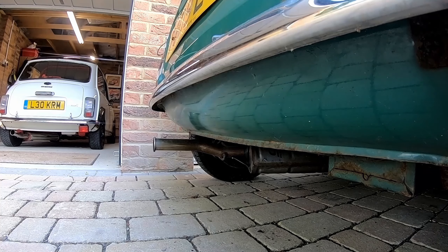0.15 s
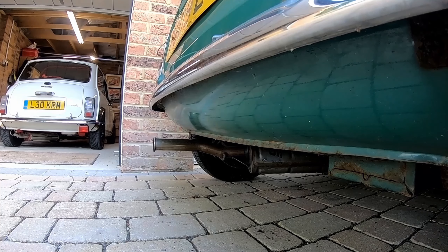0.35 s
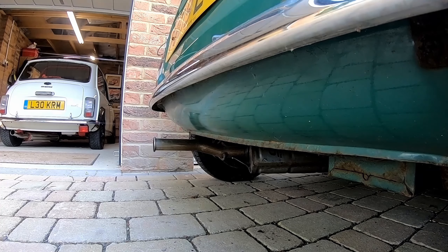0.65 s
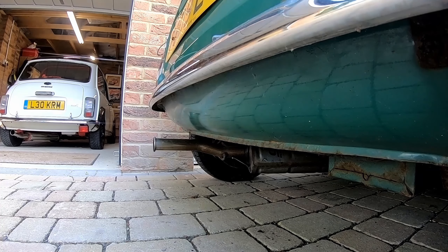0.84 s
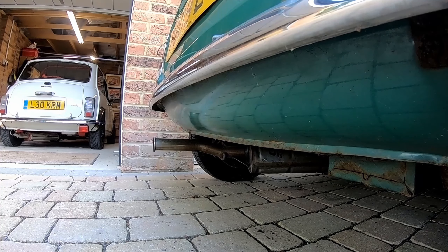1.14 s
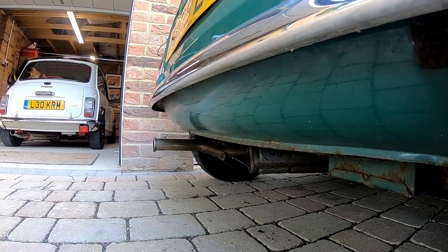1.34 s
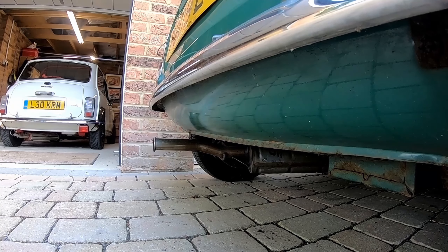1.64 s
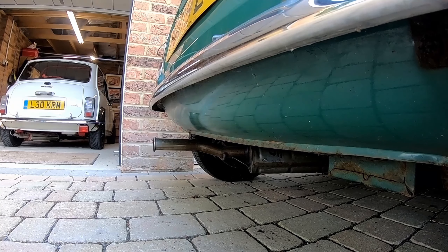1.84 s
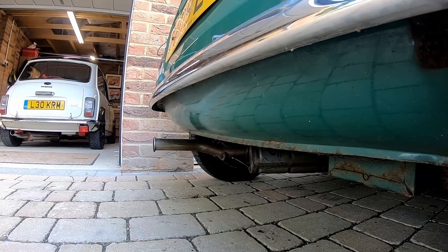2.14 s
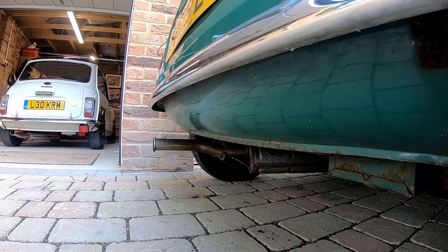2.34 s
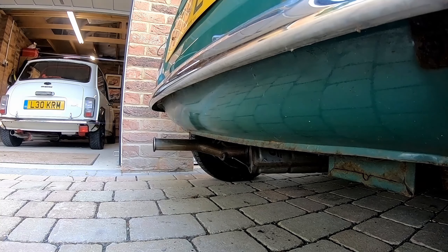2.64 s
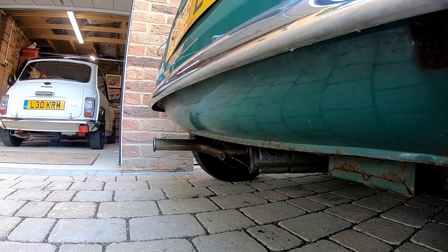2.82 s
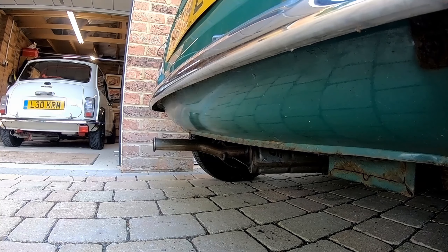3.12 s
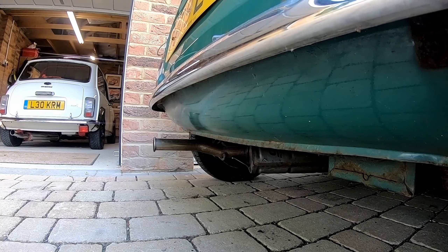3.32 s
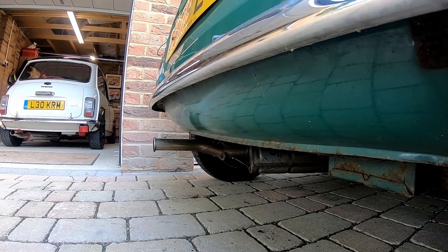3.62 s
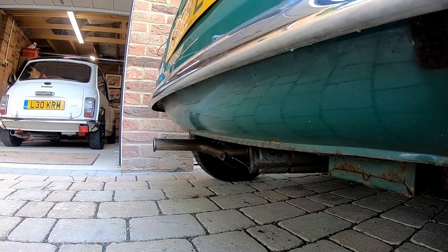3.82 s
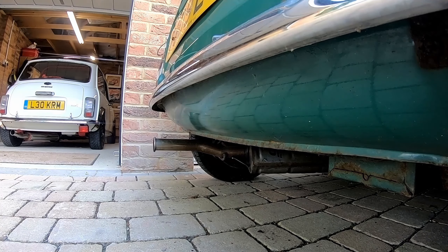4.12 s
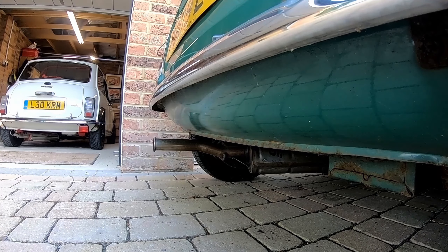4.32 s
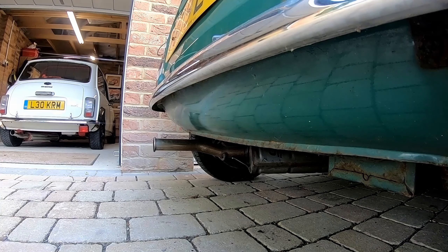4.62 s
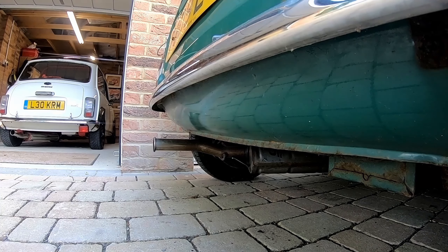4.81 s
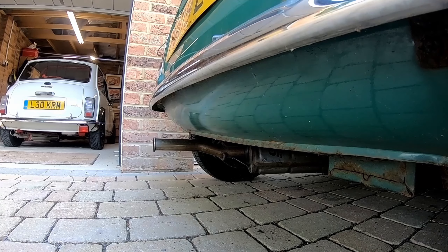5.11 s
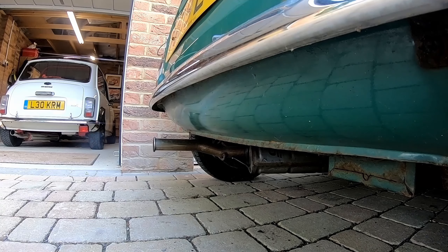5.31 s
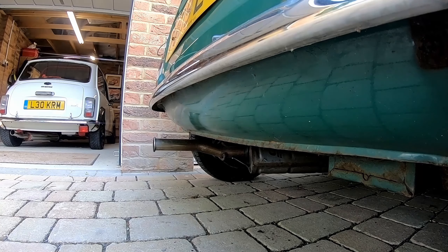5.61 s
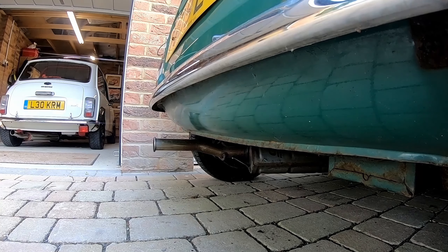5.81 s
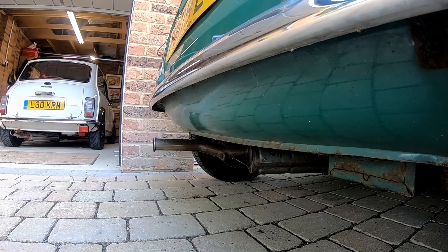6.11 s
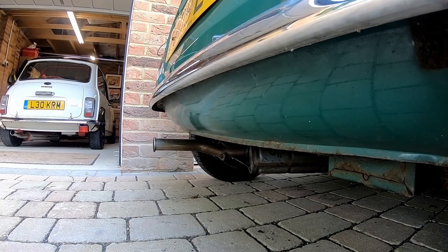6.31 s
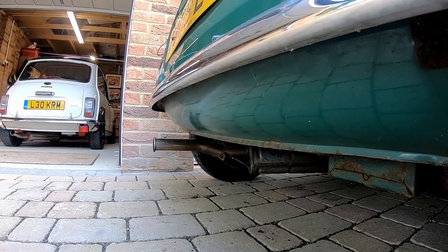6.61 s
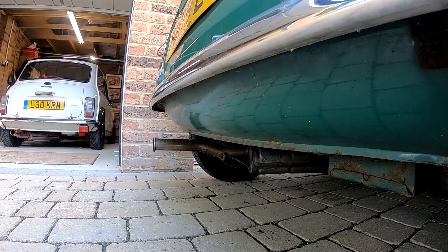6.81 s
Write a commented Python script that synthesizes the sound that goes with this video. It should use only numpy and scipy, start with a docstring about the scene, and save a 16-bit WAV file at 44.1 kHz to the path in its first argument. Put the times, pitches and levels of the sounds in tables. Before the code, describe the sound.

Close stereo pickup by a tailpipe outside a garage. A small four-cylinder engine idles for the first second as a deep, fairly even putter of about forty soft puffs a second, with faint hiss and valve clatter and a tiny dry tick near 0.2. At 1.07 the throttle snaps open with a short intake gasp; revs double by 1.3, then sag to a hollow drone until 2.2. A second, harder blip climbs to a growling, raspy peak at 2.55, about three times idle speed. The throttle shuts and the revs slide down, burbling, ringing and missing beats over low rumble, with a light pop near 3.5, reaching idle by 4.9. At 5.1 a third blip roars up, peaking at 5.5. Its descent is rough and stuttering, with sharp pops around 6.35 and strongest near 6.6, ending still slightly above idle at about 7 seconds.

```python
"""Outside a garage, by the tailpipe: a small four-cylinder engine idles and is blipped three times.
Each firing is a smooth swell of gas plus a sharp click filtered by the silencer; tones lock to the crank.
As the revs fall the firings turn uneven, stumble and pop, the pops being knocks that ring the pipe.
Filtered noise makes the gas hiss, rattle, roar and rumble; hiss and rattle rise with the revs."""
import sys
import numpy as np
from scipy import signal
from scipy.fft import rfft, irfft, next_fast_len
from scipy.io import wavfile
from scipy.ndimage import uniform_filter1d, minimum_filter1d

SR = 44100
rng = np.random.default_rng(int(sys.argv[2]) if len(sys.argv) > 2 else 0)


def materialize(psi):
    """Save the field psi as 16-bit PCM at rate SR to the path in sys.argv[1].

    A 1-D psi becomes a single channel; in a 2-D psi each row is a channel.
    """
    bounded = np.clip(np.atleast_2d(psi).T, -1, 1)
    quanta = np.round(bounded * 32767).astype(np.int16)
    wavfile.write(sys.argv[1], SR, quanta)


N = 306495

# Firing rate: t/s, firings per s
FIRING_RATE = [(0.0, 40.6), (0.15, 39.9), (0.2, 39.9), (0.3, 38.9), (1.0, 38.7), (1.07, 39.9), (1.2, 61.8),
               (1.3, 82.4), (1.335, 85.5), (1.41, 79.3), (1.61, 67.1), (1.8, 59.1), (1.9, 58.8),
               (2.2, 57.4), (2.26, 64.9), (2.4, 92.7), (2.5, 115.9), (2.56, 126.3), (2.62, 123.4),
               (2.8, 110.1), (2.95, 102.3), (3.15, 89.2), (3.3, 85.2), (3.56, 74.1), (3.84, 59.3),
               (4.05, 53.0), (4.19, 48.2), (4.61, 42.7), (4.9, 39.2), (5.09, 39.8), (5.2, 55.6),
               (5.4, 97.8), (5.47, 115.5), (5.53, 123.3), (5.85, 98.5), (5.95, 92.3), (6.05, 89.5),
               (6.37, 73.3), (6.69, 55.0), (6.95, 49.5)]
IDLE_PER_S = 39.5
# Throttle openings: opens t/s, shuts t/s, opening 0-1
THROTTLE_OPENINGS = [(1.07, 1.315, 1), (1.82, 2.21, .2), (2.21, 2.575, 1), (5.11, 5.525, 1)]
OPEN_S, SHUT_S = 0.054, 0.04
# Ragged burning as the revs fall: start t/s, end t/s, settling time/s, unevenness 0-1
RAGGED_SPELLS = [(1.63, 1.74, .1, .15), (2.83, 4.05, .5, .22), (5.86, 6.2, .06, .25), (6.53, 6.8, .2, .15)]
RAGGED_EDGE_S, CALM_UNEVEN = 0.048, 0.02
# Weak or missed firings: first t/s, firings in a row, relative loss 0-1 (scaled by STUMBLE_DEPTH)
WEAK_FIRINGS = [(1.333, 3, .85), (1.64, 1, .4), (1.671, 1, .6), (1.718, 2, .85), (1.767, 1, .7),
                (1.8, 1, .5), (1.851, 1, .35), (2.421, 5, .85), (2.562, 2, .6), (2.586, 1, .6),
                (2.834, 1, .6), (2.853, 2, .7), (2.881, 1, 1), (2.9, 1, 1), (2.929, 2, .6), (2.958, 1, .7),
                (2.978, 1, .8), (2.998, 1, 1), (3.018, 2, .5), (3.039, 2, .3), (3.06, 4, .5), (3.102, 1, 1),
                (3.124, 1, 1), (3.146, 2, .9), (3.192, 2, .9), (3.226, 1, .9), (3.26, 5, .65),
                (3.331, 3, .45), (3.379, 4, .45), (3.492, 1, 1), (3.532, 3, .5), (3.586, 1, .5),
                (3.614, 2, .75), (3.656, 1, 1), (3.686, 2, .9), (3.747, 1, .6), (3.778, 2, .9),
                (3.844, 1, 1), (3.895, 1, .6), (3.948, 1, .5), (4.021, 1, .7), (4.126, 1, .4),
                (5.382, 2, .45), (5.403, 5, .8), (5.535, 1, .7), (5.862, 1, .8), (5.882, 2, .9),
                (5.924, 2, .8), (5.957, 1, 1), (5.979, 1, 1), (6.012, 2, .95), (6.056, 3, .95),
                (6.09, 3, .5), (6.125, 1, .8), (6.148, 1, .7), (6.172, 1, .6), (6.196, 1, .5),
                (6.221, 2, .6), (6.377, 1, .8), (6.538, 1, 1), (6.554, 1, .5), (6.586, 2, 1),
                (6.636, 1, .9), (6.708, 1, .8), (6.782, 2, .95)]
STUMBLE_DEPTH = 0.9
FOUR_FIRING_SWING = 0.29  # four-firing pattern on top of the pair swing: two firings of four weaker, two stronger, as a share of the pair swing
BURN_SCATTER = 0.45  # chance in firing strength, per unit of unevenness
# Strong-weak swing between cylinder pairs, 0-1: calm, added at high revs, added at full unevenness
LOPE_CALM, LOPE_FAST, LOPE_RAGGED = 0.08, 0.14, 0.043
LOPE_FROM_OCTAVE, LOPE_WITHIN_OCTAVE = 1.4, 0.077

# Level laws: idle level/dB, dB per octave of revs, dB added by throttle,
# further dB per octave under throttle, dB at full unevenness
PUFF_LEVEL = (-11, 0.53, -2, 2.5, -5)
FRONT_LEVEL = (-44.5, 2, 13, -3.5, 18)
RING_LEVEL = (-51, 1.5, 14.5, 9.5, 35.5)
RASP_LEVEL = (-63.5, 8, -0.5, 10.5, -0.5)
HISS_LEVEL = (-58, 5, 4, -0.5, 6)
ROAR_LEVEL = (-66, 6, 10, 2, 0)

# Puff sharpness: at idle, per octave of revs, at full throttle, at full unevenness
SHARP_IDLE, SHARP_PER_OCTAVE, SHARP_THROTTLE, SHARP_RAGGED = 2.07, -1.51, 1.37, 0.86
PUFF_LOPE_DB = -25.5  # puffs weaken as the pairs differ, dB at full swing
# Silencer box struck by narrow puffs: f/Hz, relative level/dB
BOX_SPECTRUM = [(70, -48), (110, 13.5), (160, 10), (200, 0), (260, -51.5)]

# Sharp fronts through the silencer, throttle shut, then under load: f/Hz, relative level/dB
SILENCER_SHUT_SPECTRUM = [(60, -38.5), (110, -5.5), (160, 6.5), (182, 9), (205, 5.5), (240, 0.5), (270, -7),
                          (310, -49)]
SILENCER_LOAD_SPECTRUM = [(60, -36.5), (110, -9.5), (170, -0.5), (220, 11.5), (270, 1.5), (310, -48)]
# Growl of the pulling engine, and its roar: f/Hz, relative level/dB
GROWL_SPECTRUM = [(240, -15), (290, -2), (360, 6), (430, -1.5), (470, -39), (520, -18), (570, -12.5),
                  (1000, -44), (1600, -91)]
GROWL_UNDER_DB = -8  # clicks growl below the ring level
COAST_SCATTER_DB = 1  # fronts scatter in size when coasting, dB per octave of revs
# Tailpipe modes: f/Hz, width/Hz before widening, peak level/dB
PIPE_MODES = [(361, 24, 0), (410, 40, -10), (513, 35, -24), (717, 35, -20), (985, 25, -21), (1200, 50, -27),
              (1400, 50, -29), (2110, 90, -29)]
# Gas flow singing in the pipe: t/s, level/dB
SONG_LEVEL = [(0, -53.5), (1.05, -51.5), (1.3, -40.5), (1.45, -53), (1.9, -46), (2.2, -41), (2.4, -36.5),
              (2.65, -44.5), (3.0, -40.5), (3.5, -38.5), (3.9, -40), (4.4, -44.5), (4.6, -51.5), (5.1, -52),
              (5.4, -40), (5.7, -41), (6.1, -39.5), (6.4, -50), (6.95, -44)]

# Crank-locked tones, named for multiples of the firing rate: f/Hz, rms level/dB before throttle and fades
# Unevenly spaced firings from paired exhaust ports sound the halves
THREE_HALVES_SHUT_TONE = [(52, -29), (62, -31.5), (74, -27.5), (92, -23.5), (112, -52.5), (200, -51.5)]
THREE_HALVES_OPEN_TONE = [(60, -33.5), (80, -29), (100, -34), (120, -46.5), (150, -36), (200, -51)]
UPPER_HALVES_SHUT_TONE = [(90, -52), (150, -49), (250, -53), (290, -48), (420, -45), (460, -66)]
UPPER_HALVES_OPEN_TONE = [(110, -42), (200, -48), (300, -47), (350, -37), (400, -32), (435, -33),
                          (470, -55)]
# Twice the firing rate while coasting: f/Hz, rms level/dB with the throttle shut
SECOND_COASTING_TONE = [(80, -61.5), (92, -31.5), (104, -34.5), (125, -57.5), (145, -42), (170, -38.5),
                        (200, -39), (222, -53), (260, -52)]
# Third and fourth multiples: f/Hz, rms level/dB before throttle and fades
WHOLES_SHUT_TONE = [(200, -60), (235, -46), (270, -52), (310, -49), (370, -45), (420, -52), (460, -68)]
WHOLES_OPEN_TONE = [(225, -52), (270, -37), (345, -34), (375, -31.5), (420, -39), (460, -53)]
# Tones of the odd cylinder: f/Hz, rms level/dB at 1.8 octaves over idle
QUARTERS_SHUT_TONE = [(250, -70), (290, -47), (340, -44), (420, -45), (460, -66)]
TONE_WAVER_DB = 1.5
FADE_SHUT_DB, FADE_OPEN_DB = -9, -10  # fade of the higher tones, dB per multiple

# Gas hiss: f/Hz, relative level/dB per Hz
HISS_SPECTRUM = [(260, -27.5), (450, -19.5), (600, -1), (1000, -6), (1900, -10), (3260, -12.5), (5370, -20),
                 (6630, -12.5), (10400, -27), (13500, -63.5), (22000, -120)]
# Hiss drops back after the first blip: start t/s, end t/s, rise/s, fall/s
LULL_SPAN = (1.4, 1.9, .15, 0.39)
LULL_DB = -2
# Engine body and underside modes: f/Hz, width/Hz, level/dB over the noise before the boost factor
BODY_MODES = [(718, 45, 2.5), (990.4, 13, 14), (1194, 77, 3.5), (1401, 21, 5), (1581, 22, 5.5),
              (2134, 37, 6), (2445, 45, 3), (2940, 44, 0.5), (3265, 72, -0.5), (4300, 23, -2)]
TAPS_PER_FIRING, TAPS_DB, TAPS_SCATTER_DB = 9., -8, 5.5  # valve gear clatter, level against the hiss drive
# Late burns in the pipe: t/s, knock level/dB before ringing, spit level/dB, relative spit length/s
LATE_BURNS = [(2.451, -25, -50, 0.03), (3.476, -31.5, -61, 0.019), (5.149, -34.5, -44, 0.025),
              (6.364, -21.5, -40.5, 0.036), (6.536, -23.5, -47, 0.029), (6.579, -13.5, -37, 0.017),
              (6.67, -37.5, -55, 0.018), (6.764, -37, -63, 0.016)]
SPIT_LATE_S, SPIT_RISE_S = 0.004, 0.004
# Intake gulps as the throttle opens: t/s, level/dB, decay time/s
INTAKE_GULPS = [(1.07, -42.5, 0.065), (2.251, -51, 0.7), (5.108, -48, 0.11)]
# Intake noise: f/Hz, relative level/dB per Hz
INTAKE_SPECTRUM = [(590, -31.5), (1000, -7), (1410, 2), (2140, -2.5), (3500, -14.5), (4970, -24),
                   (5760, -7), (7790, -9.5), (10400, -37.5), (13500, -69), (22000, -120)]
# Thin whistles as the throttle opens: t/s, f/Hz, level/dB, half length/s
WHISTLE_EVENTS = [(1.155, 7750, -65, .02), (1.22, 8100, -66, .02), (5.265, 6700, -65, .015)]
# Low rumble: f/Hz, relative level/dB per Hz
RUMBLE_SPECTRUM = [(15, -27), (38, 9.5), (65, 17.5), (120, 9), (230, 4.5), (290, -16.5), (420, -29.5),
                   (520, -58)]
RUMBLE_DB = -34.5  # before the swell with unevenness
# One dry tick: t/s, relative level/dB
DRY_TICK = [(0.187, -27)]

# Left-right likeness: f/Hz, likeness 0-1
LIKENESS = [(70, 0.97), (200, 0.92), (500, 0.92), (1000, 0.76), (2000, 0.9), (4000, 0.43), (8000, 0.14)]
# Phase of right against left: f/Hz, lag/rad (negative leads)
RIGHT_LAG = [(100, 0), (200, -.1), (430, -.8), (690, -4.3), (950, -4.6), (1720, -4.9), (2670, -5.6),
             (4310, -6), (5510, -7.6), (7840, -9.5)]
# Left over right: f/Hz, level/dB
LEFT_EXCESS = [(40, .2), (100, .5), (190, .5), (330, -1.3), (580, -.6), (1020, -2), (1800, -3.5),
               (3180, -4), (5610, -5), (9900, -5)]
EDGE_HZ = 15300


def firings(t):
    """Crank kinematics: integrated rate gives position in firings; strengths exclude, then include, stumbles."""
    turns = np.cumsum(columns(FIRING_RATE, t)[0]) / SR
    slip = wander(900)
    # ragged burning makes puffs arrive early or late
    turns = np.maximum.accumulate(np.maximum(turns + .14 * running(t)[2] * slip, 0))
    k = np.arange(int(turns[-1]) + 1)
    at = np.interp(k + .5, turns, t)
    uneven, lope = running(at)[2], lope_at(at)
    pair_swing = lope * ((-1.) ** k + FOUR_FIRING_SWING * np.cos(np.pi * k / 2 + .8))
    chance = BURN_SCATTER * uneven * rng.standard_normal(2000)[:len(k)]
    steady = np.maximum(1 - pair_swing + chance, 0)
    strength = steady
    for start, row, lost in WEAK_FIRINGS:
        first = np.argmin(abs(at - start))
        weak = (k >= first) * (k < first + row)
        strength = strength * (1 - STUMBLE_DEPTH * lost * weak)
    firing = turns.astype(int)
    return turns, steady[firing], strength[firing]


def puffs(t, turns, strength):
    """Pulsating flow: one swell per firing, a higher power of a sine being narrower; narrow ones knock the box."""
    revs, throttle, uneven = running(t)
    puff_db = level_db(PUFF_LEVEL, t) + PUFF_LOPE_DB * lope_at(t)
    sharp = SHARP_IDLE + SHARP_PER_OCTAVE * revs + SHARP_THROTTLE * throttle + SHARP_RAGGED * uneven
    pulse = abs(np.sin(np.pi * turns)) ** (2 * np.maximum(sharp, 1))
    swell = np.sqrt(8) * gain_of(puff_db) * strength * pulse
    swell = swell - uniform_filter1d(swell, size=4400)  # remove the steady flow
    # dividing by the pipe's gain at the firing rate keeps the level law
    swell = colour(swell, tailpipe) / abs(tailpipe(columns(FIRING_RATE, t)[0]))
    knocks = (np.diff(np.floor(turns + .08), prepend=0) > 0) * strength * np.maximum(sharp - 1, 0)
    return swell + gain_of(-39.0) * evened(shaped(knocks, BOX_SPECTRUM))


def fronts(t, turns, steady):
    """Impulse excitation: clicks filtered by silencer and growl; noise sings, rasps and roars as pipe flow."""
    front_db, ring_db, rasp_db = (level_db(law, t) for law in (FRONT_LEVEL, RING_LEVEL, RASP_LEVEL))
    revs, throttle, uneven = running(t)
    pull = .95 * throttle ** 2
    count = np.floor(turns + .4)
    fire = np.diff(count, prepend=0) > 0
    twin = 1 - np.clip(.12 + 1.8 * lope_at(t), 0, .9) * (-1.) ** count  # cylinder pairs differ
    chance = rng.standard_normal((4, N))
    clicks = fire * twin * gain_of(3.4 * chance[0])
    scatter_db = 7 * uneven + COAST_SCATTER_DB * revs * (1 - throttle) ** 4
    ragged = clicks * steady * gain_of(scatter_db * chance[0])
    low = (1 - throttle ** 2) * shaped(ragged, SILENCER_SHUT_SPECTRUM)
    low = low + throttle ** 2 * shaped(ragged, SILENCER_LOAD_SPECTRUM)
    growl = shaped(clicks, GROWL_SPECTRUM)
    sung = colour(chance[1], lambda hz: pipe(hz) ** 2)  # squaring favours the strongest modes
    gusts = (0.5 + np.exp(-((turns + 0.21) % 1) / 0.63)) * chance[2]
    rasp = colour(gusts, lambda hz: (abs(pipe(hz)) + .03) * (hz > 470) / (1 + (hz / 1100) ** 4))
    ring = np.sqrt(pull) * levelled(growl, ring_db + GROWL_UNDER_DB)
    ring = ring + levelled(sung, columns(SONG_LEVEL, t)[0])
    roar = levelled(shaped(chance[3], GROWL_SPECTRUM), level_db(ROAR_LEVEL, t))
    return roar + levelled(low, front_db) + ring + levelled(rasp, rasp_db)


def tones(t, strength):
    """Order analysis: sines at multiples of firing rate; off load, all but the second weaken with weak firings."""
    per_s = columns(FIRING_RATE, t)[0]
    revs, throttle, _ = running(t)
    shut = 1 - throttle
    turns = np.cumsum(per_s) / SR
    sine = lambda order: np.sin(2 * np.pi * order * turns)
    second = sine(2) * shut ** 2 * gain_of(read(SECOND_COASTING_TONE, 2 * per_s))
    fade_db = FADE_SHUT_DB + (FADE_OPEN_DB - FADE_SHUT_DB) * throttle
    out = 0
    for order in (2.75, 3.25):
        db = read(QUARTERS_SHUT_TONE, order * per_s) + 12 * (revs - 1.8)
        out = out + shut ** 2 * gain_of(db) * sine(order)
    for order in (1.5, 2.5, 3.5, 4.5):
        if order < 2:
            shut_tone, open_tone = THREE_HALVES_SHUT_TONE, THREE_HALVES_OPEN_TONE
        else:
            shut_tone, open_tone = UPPER_HALVES_SHUT_TONE, UPPER_HALVES_OPEN_TONE
        db = shut * read(shut_tone, order * per_s) + throttle * read(open_tone, order * per_s)
        db = db + fade_db * max(order - 3.5, 0)
        db = db + shut * FADE_SHUT_DB * (order == 3.5) * (per_s < 105)
        out = out + gain_of(db + TONE_WAVER_DB * wander(2500)) * sine(order)
    for order in (3, 4):
        for share, table in ((throttle, WHOLES_OPEN_TONE), (shut, WHOLES_SHUT_TONE)):
            db = read(table, order * per_s) + fade_db * (order - 3.5)
            out = out + share ** 2 * gain_of(db) * sine(order)
    missed = 1 - uniform_filter1d(np.minimum(strength, 1), size=900)
    return np.sqrt(2) * (second + out * (1 - missed * shut))


def pops(t):
    """Transient excitation: each late burn knocks the pipe in quick steps, then spits a burst of noise."""
    knock, spit = np.zeros(N), np.zeros(N)
    for start, ring_db, spit_db, length in LATE_BURNS:
        age = t - start - SPIT_LATE_S
        decay = np.exp(-(np.maximum(age - SPIT_RISE_S, 0) / (0.69 * length)) ** 1.9)
        spit += gain_of(spit_db) * np.clip(age / SPIT_RISE_S, 0, 1) * decay
        for late, share in ((0, 0.65), (.0045, -0.63), (.008, 0.45)):
            age = np.maximum(t - start - late, 0) / 0.00034
            knock += share * gain_of(ring_db) * age * np.exp(-age)
    ring = 7.3 * colour(knock, lambda hz: (pipe(hz, width=3.0) + 0.082 / (1 + 1j * hz / 250)) * (hz > 100))
    spat = colour(rng.standard_normal((2, N)),
                  lambda hz: gain_of(read(HISS_SPECTRUM, hz)) * body(hz, boost=3) * (hz > 600))
    return ring + spit * evened(spat)


def gulps(t, turns):
    """Modulated flow noise: the intake rasps, one gasp per firing, each gulp decaying exponentially."""
    level = sum(gain_of(db) * np.clip((t - start) / 0.038, 0, 1) * np.exp(-abs(t - start) / length)
                for start, db, length in INTAKE_GULPS)
    gasp = evened(0.82 + np.sin(np.pi * (turns + .2)) ** 4)
    noise = colour(rng.standard_normal((2, N)),
                   lambda hz: gain_of(read(INTAKE_SPECTRUM, hz)) * body(hz, boost=0.37))
    return level * gasp * evened(noise)


def whistles(t):
    """Amplitude modulation: slow noise on a sine makes a short, narrow band."""
    out = np.zeros(N)
    for centre, hz, db, half in WHISTLE_EVENTS:
        waver = evened(uniform_filter1d(rng.standard_normal(N), size=300))
        envelope = gain_of(db) * np.exp(-((t - centre) / half) ** 2)
        out += envelope * (1 + 1.9 * waver) * np.sin(2 * np.pi * hz * t)
    return out


def hiss(t, turns):
    """Broadband excitation: noise and random taps ring the body, pulsed by firings; the top grows faster."""
    flicker = wander(250)
    pulse = 1 + .5 * np.exp(-(turns % 1) / 0.5)
    hiss_db = level_db(HISS_LEVEL, t) + LULL_DB * span(t, *LULL_SPAN)
    level = gain_of(hiss_db + 0.64 * flicker) * evened(pulse)
    tapped = rng.random((2, N)) < TAPS_PER_FIRING * columns(FIRING_RATE, t)[0] / SR
    taps = tapped * gain_of(TAPS_SCATTER_DB * rng.standard_normal((2, N)))
    drive = rng.standard_normal((2, N)) + gain_of(TAPS_DB) * evened(taps)
    noise = evened(colour(drive, lambda hz: gain_of(read(HISS_SPECTRUM, hz)) * body(hz)))
    top = colour(noise, lambda hz: 1 / (1 + (5500 / (hz + 1)) ** 6))
    return level * (noise - top + top * gain_of(.5 * (hiss_db + 54.0)))


def rumble(t):
    """Random low-frequency excitation: bass noise grows as uneven burning shakes the exhaust."""
    noise = gain_of(RUMBLE_DB) * evened(shaped(rng.standard_normal(N), RUMBLE_SPECTRUM))
    return noise * (.08 + 5. * running(t)[2])


def tick(t):
    """Click by discontinuity: a short jump in the waveform, heard as one dry tick."""
    start, db = DRY_TICK[0]
    age = t - start - .002
    before = np.exp(-abs(age) / 0.0017)
    after = np.clip(1 - age / 0.001, -.25, 1) * np.exp(-abs(age) / 0.0013)
    return -4. * gain_of(db) * uniform_filter1d(np.where(age < 0, before, after), size=10)


def running(t):
    """Engine state: revs in octaves over idle, throttle 0-1, unevenness 0-1."""
    revs = np.log2(columns(FIRING_RATE, t)[0] / IDLE_PER_S)
    throttle = sum(wide * span(t, a, b, OPEN_S, SHUT_S) for a, b, wide in THROTTLE_OPENINGS)
    uneven = CALM_UNEVEN + sum(u * span(t, a, b, RAGGED_EDGE_S, settle) for a, b, settle, u in RAGGED_SPELLS)
    return revs, np.clip(throttle, 0, 1), np.clip(uneven, 0, 1)


def lope_at(t):
    """Alternation: cylinder pairs differ more at high revs and in ragged spells."""
    revs, _, uneven = running(t)
    fast = np.clip((revs - LOPE_FROM_OCTAVE) / LOPE_WITHIN_OCTAVE, 0, 1)
    return np.clip(LOPE_CALM + LOPE_FAST * fast + LOPE_RAGGED * uneven, 0, .9)


def level_db(law, t):
    """Level law: decibels from revs, throttle and unevenness."""
    idle_db, rev_db, open_db, pull_db, ragged_db = law
    revs, throttle, uneven = running(t)
    return idle_db + rev_db * revs + throttle * (open_db + pull_db * revs) + ragged_db * uneven


def tailpipe(hz):
    """Radiation: the long pipe favours slow swells; the microphone cuts the deepest bass steeply."""
    poles = signal.butter(4, 2 * np.pi * 33, "high", analog=True)
    return -signal.freqs(*poles, 2 * np.pi * hz)[1] / (1 + 1j * hz / 60.)


def pipe(hz, width=1.3):
    """Modal resonance: summed responses of the tailpipe, each mode widened by a factor."""
    return sum(gain_of(db) / (1 + 2j * (hz - f) / (w * width)) for f, w, db in PIPE_MODES)


def body(hz, boost=0.86):
    """Structural resonance: body modes standing on a flat response."""
    return 1 + boost / 1.5 * sum(gain_of(db) / (1 + 2j * (hz - f) / w) for f, w, db in BODY_MODES)


def gain_of(db):
    """Logarithmic level: decibels to amplitude gain."""
    return 10 ** (np.asarray(db) / 20)


def evened(x):
    """Normalisation: scales to rms 1."""
    return x / np.sqrt(np.mean(x ** 2) + 1e-20)


def smoothed(x, size):
    """Low-pass averaging: two passes of a running mean."""
    return uniform_filter1d(uniform_filter1d(x, size=size), size=size)


def wander(size):
    """Slow random fluctuation: smoothed noise of rms 1."""
    return evened(smoothed(rng.standard_normal(N), size))


def levelled(x, db):
    """Short-term rms control: brings a slowly changing sound to the level db."""
    return gain_of(db) * x / np.sqrt(abs(smoothed(x ** 2, 4000)) + 1e-14)


def read(points, hz):
    """Spectral interpolation: reads a table on a log-frequency axis."""
    f, value = np.transpose(points)
    return np.interp(np.log(hz + 1), np.log(f + 1), value)


def columns(table, t):
    """Linear interpolation: each column of a curve at the times t."""
    s, *rest = np.transpose(table)
    return [np.interp(t, s, c) for c in rest]


def span(t, start, end, rise, fall):
    """Trapezoidal envelope: rises after start, holds, falls after end."""
    return np.clip((t - start) / rise, 0, 1) * np.clip(1 - (t - end) / fall, 0, 1)


def colour(x, gain):
    """Linear filtering: multiplies the spectrum by a function of frequency."""
    size = next_fast_len(N + 8192)
    return irfft(rfft(x, size) * gain(np.fft.rfftfreq(size, 1 / SR)), size)[..., :N]


def shaped(x, spectrum):
    """Spectral shaping: filters by a table of f/Hz and level/dB."""
    return colour(x, lambda hz: gain_of(read(spectrum, hz)))


def ports(near, spread):
    """Interchannel coherence: a shared part, shifted and tilted by frequency, and a spread part on the right."""
    same = lambda hz: np.clip(read(LIKENESS, hz), 0, 1)
    right = colour(near, same) + colour(spread, lambda hz: np.sqrt(1 - same(hz) ** 2))
    tilt = lambda hz: gain_of(read(LEFT_EXCESS, hz) / 2)
    shift = lambda hz: np.exp(-1j * read(RIGHT_LAG, hz))
    return np.array([colour(near, tilt), colour(right, lambda hz: shift(hz) / tilt(hz))])


def scene():
    """Superposition: the engine layers add at two ports."""
    t = np.arange(N) / SR
    turns, steady, strength = firings(t)
    air = hiss(t, turns) + pops(t) + gulps(t, turns)
    bass = rumble(t)
    rung = fronts(t, turns, steady) + whistles(t)
    near = puffs(t, turns, strength) + bass + tones(t, strength) + rung + air[0]
    near = near * np.clip((t[-1] - t) / .004, 0, 1)  # short fade at the end
    spread = np.roll(rung, 700) + air[1]  # the shift makes the ringing unlike its near copy
    return ports(near, spread) + tick(t)


def record(dry):
    """Peak limiting and band limiting: loud peaks are held; the microphone dulls above ten kilohertz."""
    peak = -minimum_filter1d(-abs(dry).max(0), size=2400)
    held = dry / np.maximum(uniform_filter1d(peak, size=1200) / 0.47, 1)
    dulled = colour(held, lambda hz: gain_of(np.interp(hz, [10000, 11000], [0, -6])))
    low_pass = signal.firwin(255, EDGE_HZ, window=("kaiser", 8), fs=SR)
    return signal.oaconvolve(dulled, low_pass[None], "same")


dry = scene()
out = record(dry)
materialize(out)
```